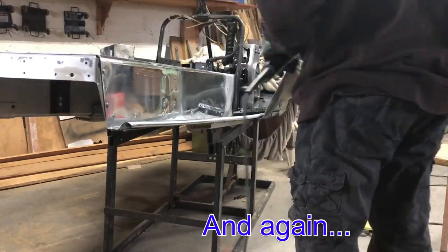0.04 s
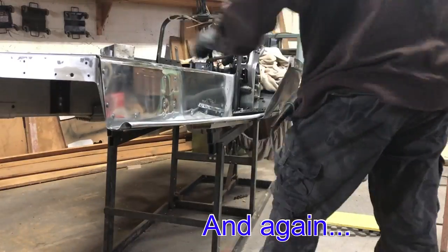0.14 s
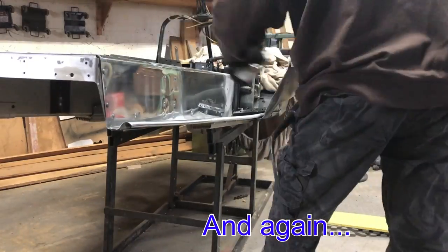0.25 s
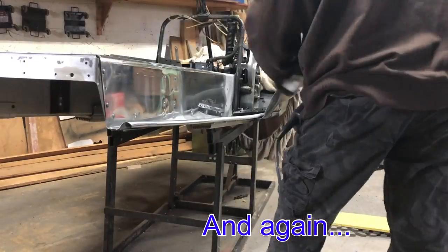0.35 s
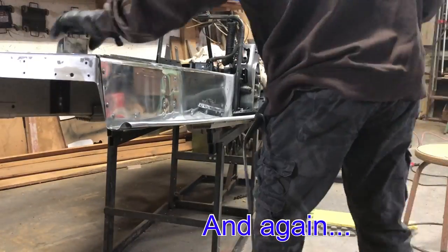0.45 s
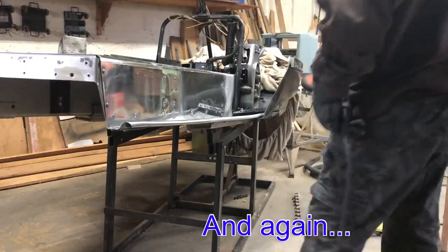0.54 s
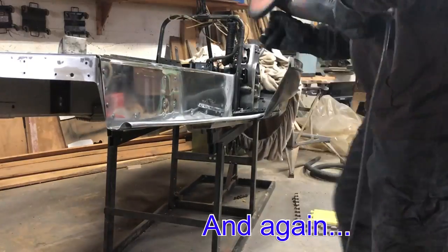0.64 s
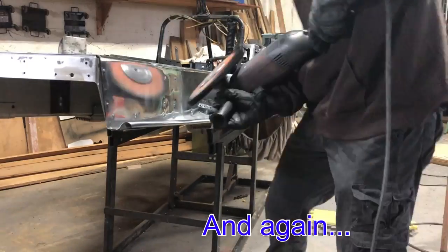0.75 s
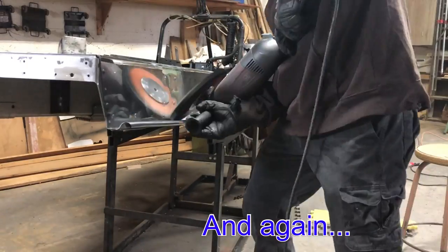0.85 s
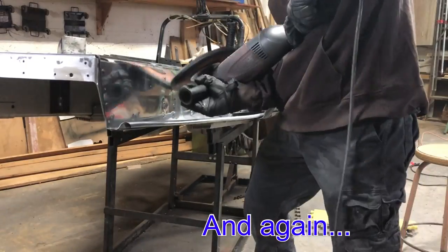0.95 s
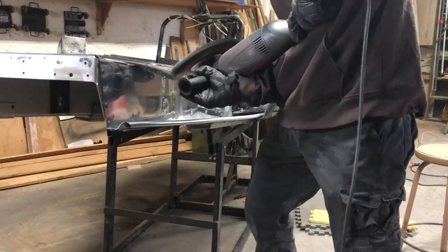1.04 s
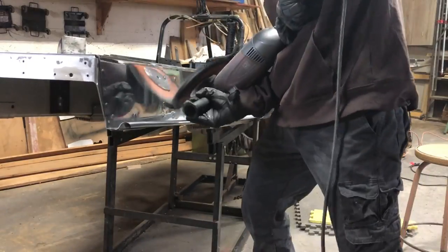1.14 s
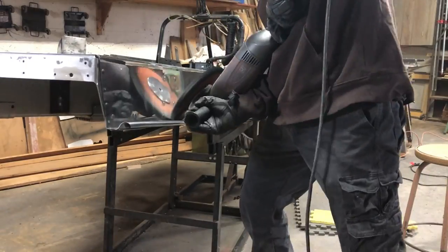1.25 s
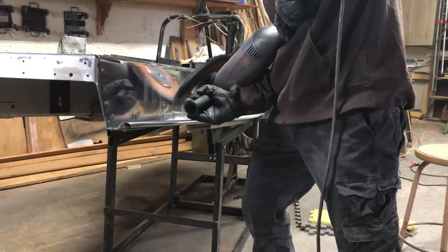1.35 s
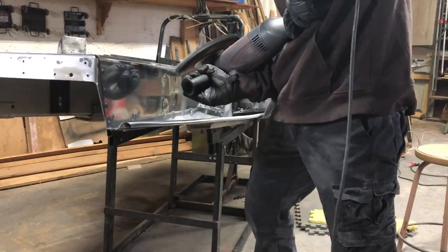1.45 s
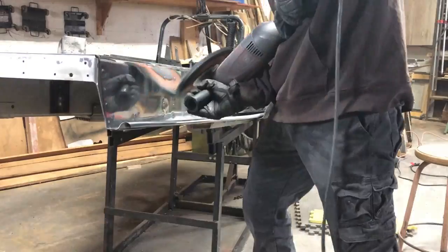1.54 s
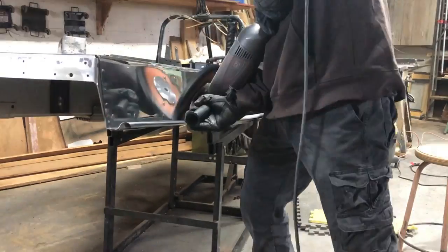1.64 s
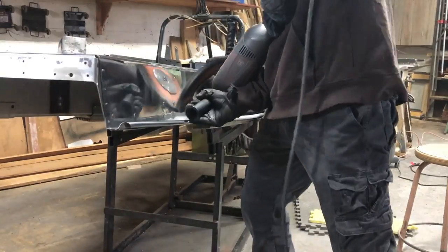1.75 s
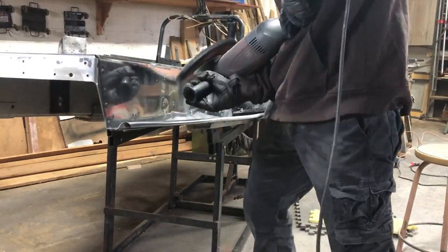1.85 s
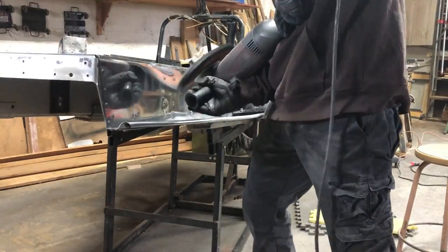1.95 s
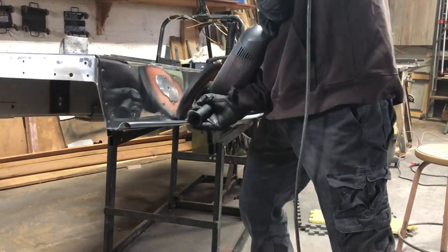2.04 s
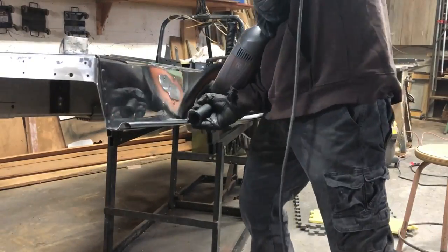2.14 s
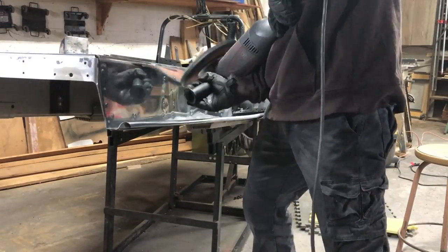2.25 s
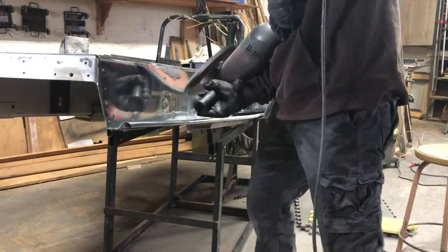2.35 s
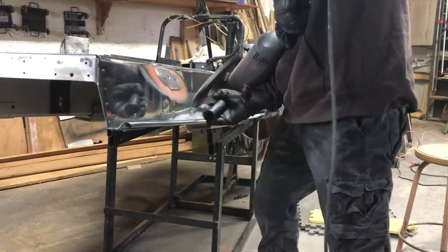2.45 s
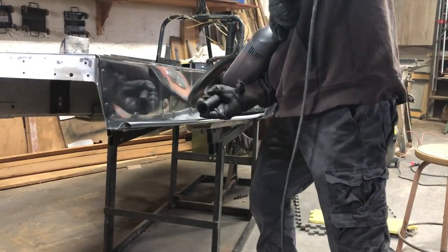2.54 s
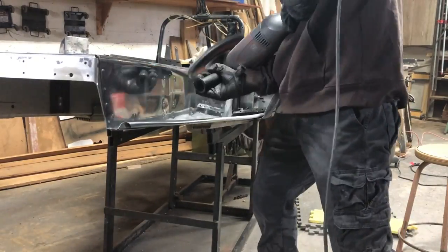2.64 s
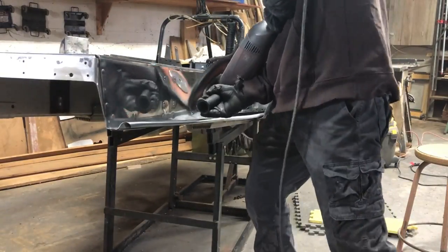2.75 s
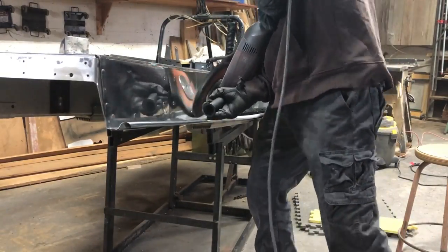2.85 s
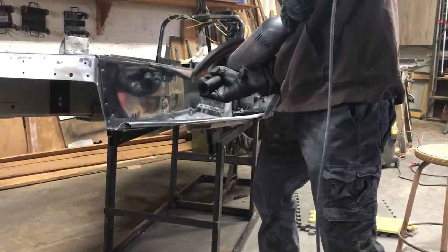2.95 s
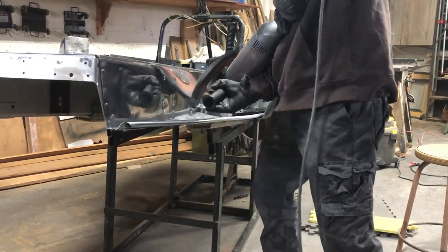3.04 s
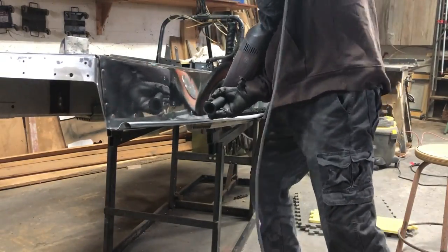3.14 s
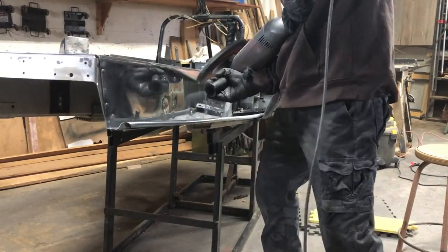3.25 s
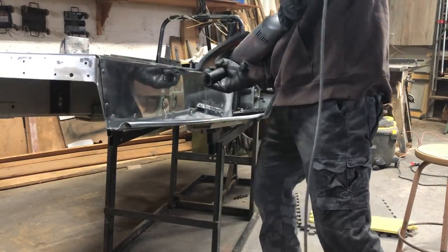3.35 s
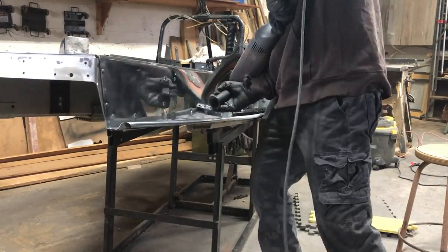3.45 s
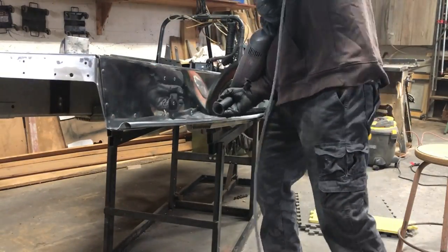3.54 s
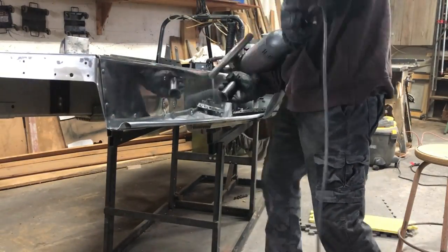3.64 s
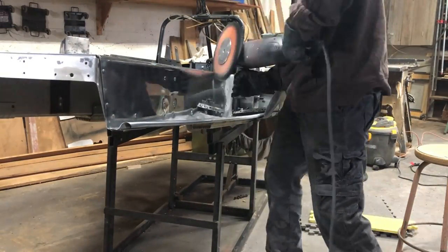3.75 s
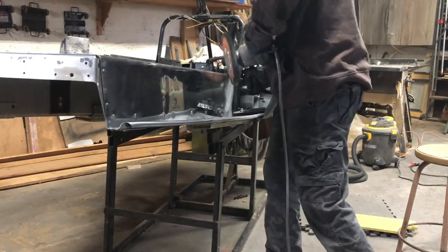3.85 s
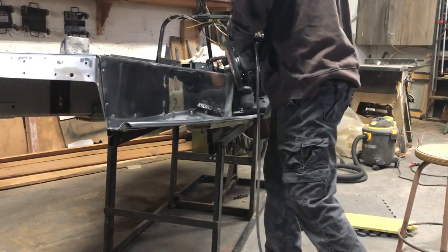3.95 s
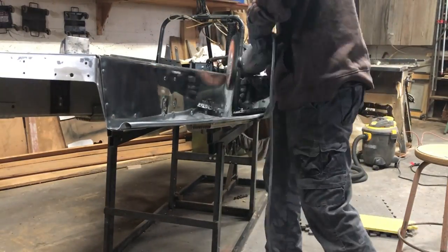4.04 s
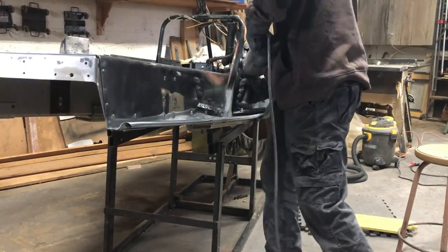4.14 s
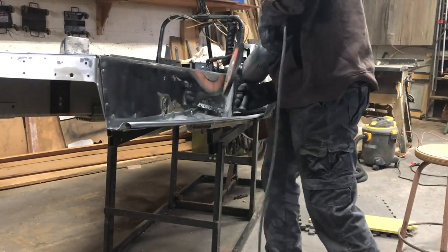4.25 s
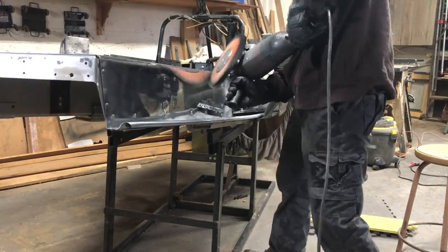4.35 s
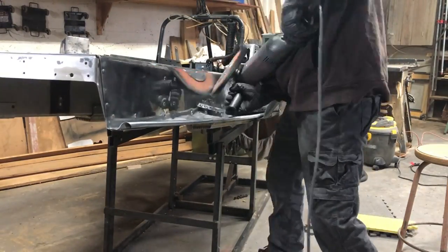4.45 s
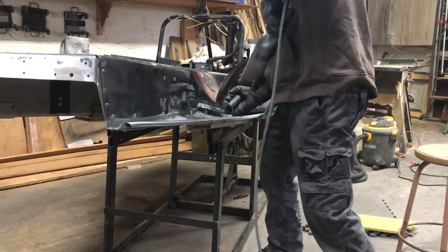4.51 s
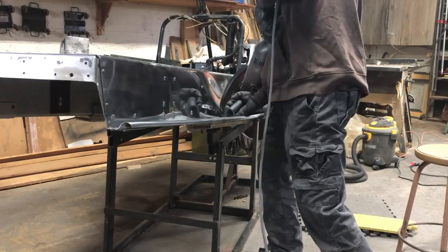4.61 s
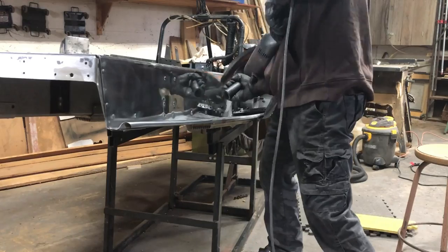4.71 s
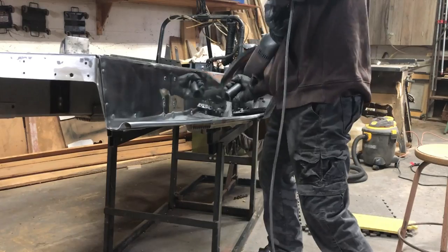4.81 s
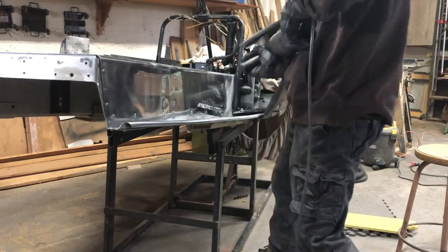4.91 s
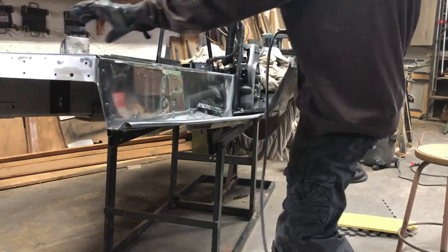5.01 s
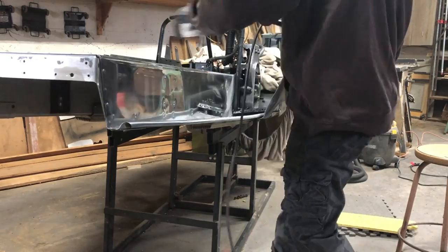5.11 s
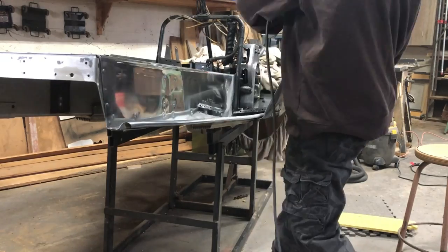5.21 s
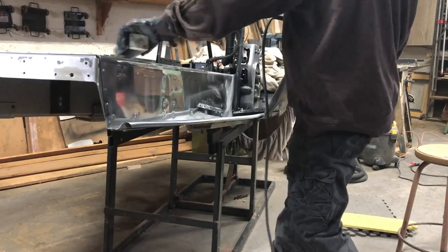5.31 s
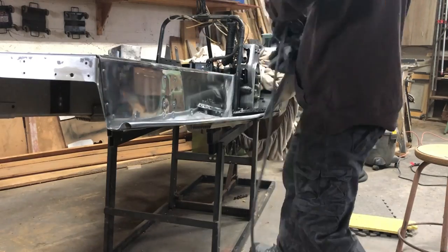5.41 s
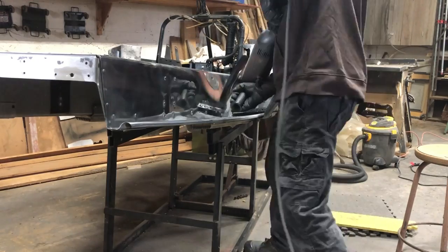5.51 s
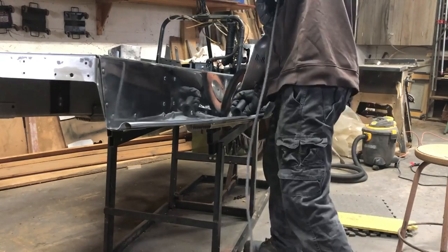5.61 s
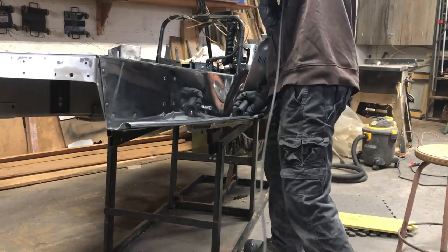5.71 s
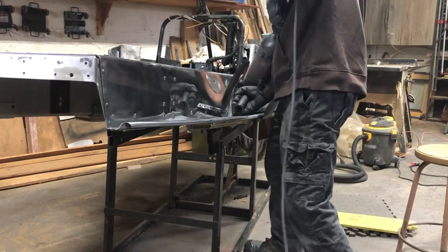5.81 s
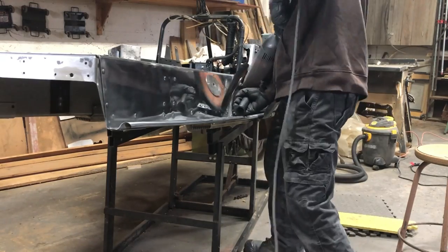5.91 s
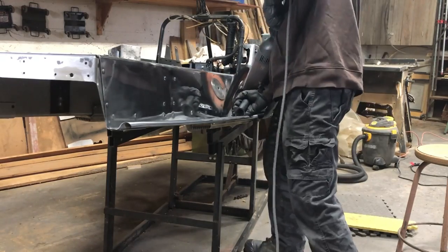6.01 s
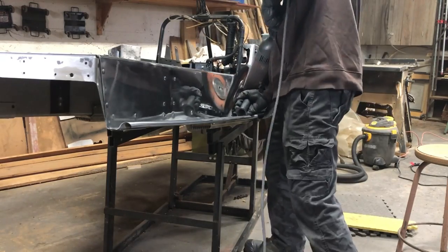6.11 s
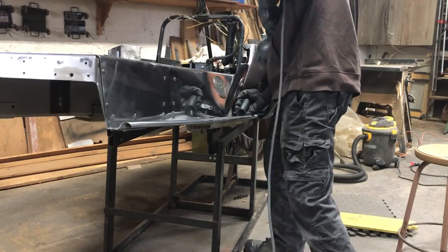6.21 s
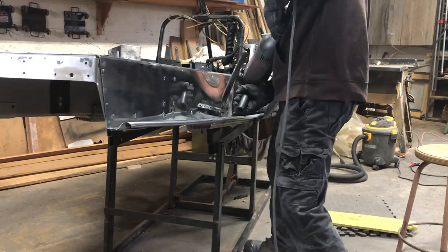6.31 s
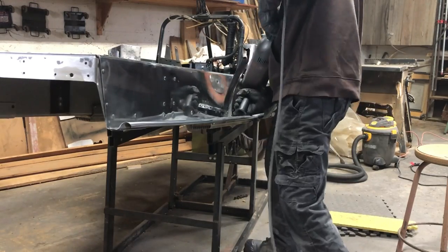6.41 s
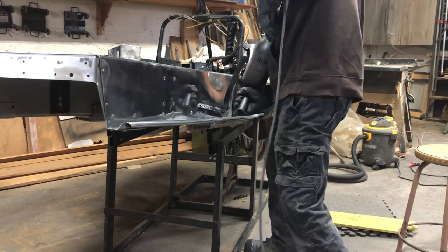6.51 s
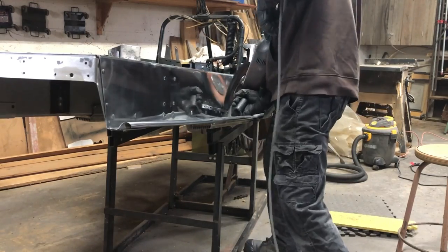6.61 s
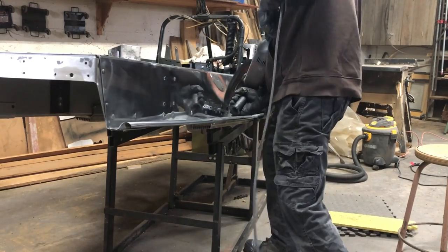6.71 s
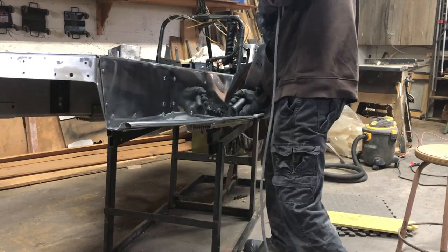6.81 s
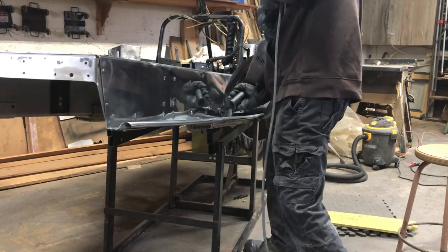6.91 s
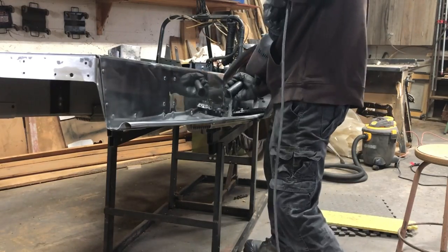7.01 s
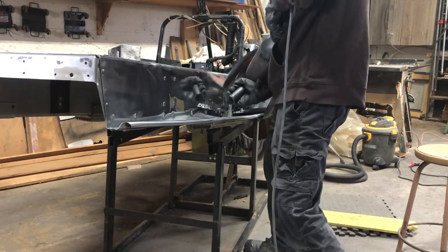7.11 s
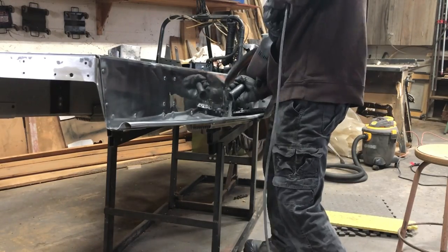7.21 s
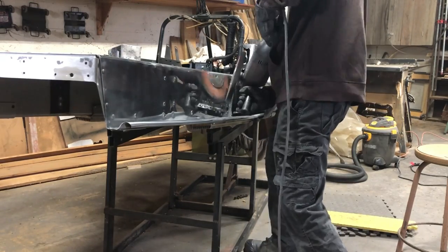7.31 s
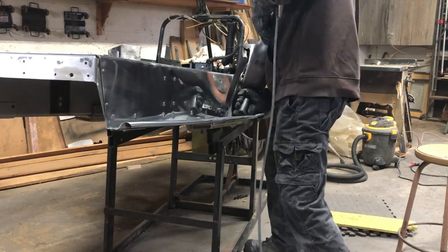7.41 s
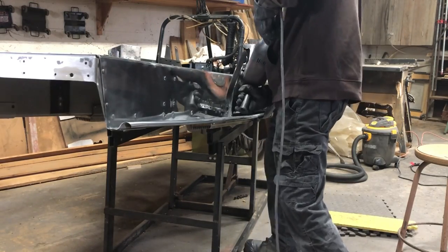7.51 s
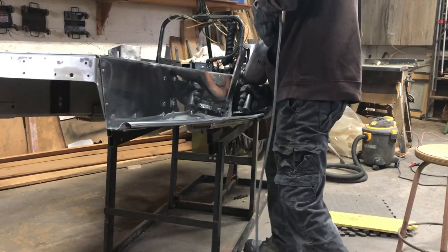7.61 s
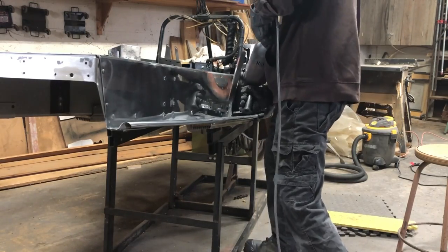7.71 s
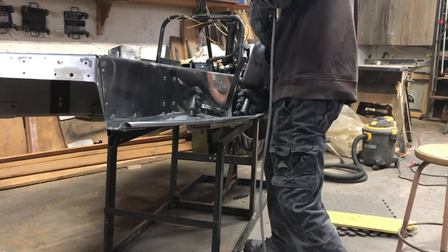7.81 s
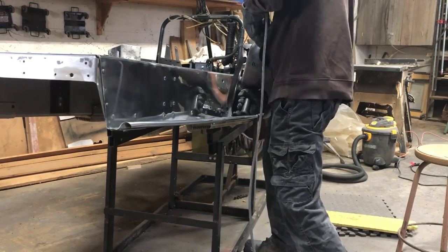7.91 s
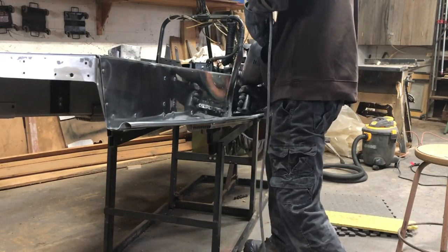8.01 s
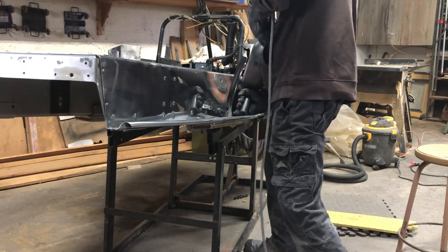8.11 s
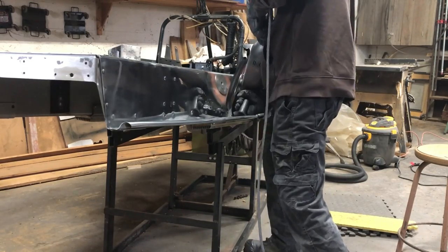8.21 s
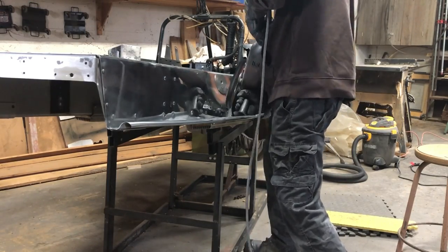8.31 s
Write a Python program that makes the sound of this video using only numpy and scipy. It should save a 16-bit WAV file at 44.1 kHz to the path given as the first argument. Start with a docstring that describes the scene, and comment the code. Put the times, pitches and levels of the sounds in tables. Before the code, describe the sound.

In a workshop, a power polisher starts and whines freely, then drops into a rough, fluctuating buzz as its pad works a metal panel.

```python
"""In a workshop, at one microphone: an electric polisher spins up and works a sheet-metal part in passes.
Pressing the pad down slows the motor and makes its shaft orders, summed as drifting sines, buzz.
Lifted, it runs free with a gear whine; shaped noise makes the air and friction hiss and the start-up rush.
Noise bursts click at the switch and at hard touches, and rattling knocks ring the part as it clanks.
Across the workshop another machine coasts down as a narrow noise band, among faint tones and a low rumble."""
import sys
import numpy as np
from scipy import signal
from scipy.io import wavfile
from scipy.ndimage import uniform_filter1d

SR = 44100
rng = np.random.default_rng(int(sys.argv[2]) if len(sys.argv) > 2 else 0)


def master(y):
    """Save y as 16-bit WAV."""
    cut = np.clip(np.atleast_2d(y).T, -1, 1)
    pcm = np.round(cut * 32767)  # scale
    wavfile.write(sys.argv[1], SR, pcm.astype(np.int16))


N = 368676
TIME = np.arange(N) / SR

# air and friction hiss, density per Hz before colour: t/s, low level/dB, middle level/dB, high level/dB
HISS_LEVELS = [(0, -76.5, -88, -98), (.175, -76.5, -79.5, -89), (.36, -66, -68.5, -70),
               (.444, -63, -62.5, -71), (.75, -63.5, -62, -67), (1, -68, -68, -69), (1.2, -71, -70, -67),
               (1.5, -66.5, -70, -71.5), (2, -65, -70, -74), (2.15, -65, -68, -71), (2.4, -66, -70, -75),
               (2.7, -68, -70, -71), (3.4, -67.5, -71, -76), (3.82, -72, -72, -71), (4.1, -73, -75, -78),
               (4.8, -72, -73, -71), (5.0, -70, -70, -74), (5.15, -67, -66, -73), (5.28, -67.5, -63.5, -68),
               (5.5, -66.5, -66, -70), (5.7, -67, -67, -68), (6.15, -67, -72, -70), (6.8, -71, -74, -75),
               (7.25, -71, -73, -75), (7.5, -68.5, -72, -70), (8.36, -68.5, -72, -74)]
# where those three levels hold: f/Hz
HISS_ANCHORS_HZ = (1800, 5500, 10500)
# fixed spectral colour added to the hiss: f/Hz, level/dB
HISS_COLOUR_DB = [(150, -28), (260, -23.5), (400, -22.5), (700, -13.5), (1200, -9), (2000, -4), (3200, -1),
                  (5000, 0), (8800, 4), (12000, 0), (15800, -0.5)]
# the other machine coasting down: t/s, f/Hz, level/dB
COASTING_MACHINE = [(1.1, 724, -67), (1.5, 686, -56.5), (3.3, 593.5, -56), (4.5, 575.8, -65),
                    (6.0, 520, -63), (6.4, 518.5, -55), (6.6, 471.6, -75)]
# faint tones that come and go: middle t/s, length/s, f/Hz, level/dB
FAINT_TONES = [(0.198, 0.61, 430, -79), (.2, .55, 511, -61.5), (0.222, 0.62, 730, -56.5),
               (0.33, 0.25, 2420, -42), (0.3, 0.23, 3120, -40), (0.802, 0.31, 1270, -43),
               (1.34, 0.11, 714, -46), (1.672, .1, 713, -47), (2.095, 0.14, 730, -49),
               (5.46, 0.11, 317, -48), (6.002, 0.045, 722, -39.5), (8.312, 0.093, 728, -44)]
# low rumble before its flicker: t/s, level/dB
RUMBLE_LEVEL = [(0.0, -89), (0.09, -104), (0.92, -64.5), (1.11, -74), (1.27, -57), (1.31, -70), (2.29, -66),
                (2.36, -94), (2.96, -64), (3.05, -94), (3.23, -64), (3.44, -100), (3.58, -61), (3.63, -78),
                (5.39, -97), (5.55, -71), (6.06, -68), (6.15, -80), (6.59, -68), (6.91, -101), (7.61, -84),
                (8.07, -94), (8.14, -73), (8.3, -95)]
# bright bursts: t/s, relative level/dB, centre f/Hz, width f/Hz, hold/s, t60/s
CLICK_BURSTS = [(.107, -37, 13000, 4000, .004, .02), (.134, -19.5, 7500, 8000, .003, .012),
                (.194, -32, 11000, 6000, .002, .02), (.37, -12, 7200, 4000, .032, .03),
                (.508, -13, 3500, 3000, .006, .05), (1.85, -14.5, 3500, 4000, .02, .04),
                (5.407, -9, 2900, 2400, .011, .04)]
# shaft speed as the load sets it, once spun up: t/s, f/Hz
LOADED_SPEED = [(.6, 560), (.75, 548.6), (.86, 544), (.928, 533), (.99, 506), (1.07, 458.5), (1.24, 422),
                (1.3, 432), (1.394, 466.4), (1.51, 438.6), (1.58, 443), (1.626, 434), (1.7, 447),
                (1.81, 451.2), (1.968, 430), (2.015, 442.3), (2.108, 441.7), (2.24, 459.8), (2.33, 447),
                (2.432, 461.4), (2.482, 509), (2.555, 541), (2.62, 501), (2.72, 479), (2.896, 463.5),
                (2.98, 466.7), (3.07, 462.3), (3.115, 469.5), (3.273, 471), (3.31, 464), (3.42, 475),
                (3.445, 468), (3.502, 490), (3.614, 464.3), (3.667, 477.4), (3.734, 478), (3.784, 495),
                (3.864, 434.6), (3.914, 418.5), (3.99, 440), (4.058, 448), (4.22, 441.6), (4.33, 476.6),
                (4.447, 462.5), (4.525, 504.3), (4.6, 507), (4.649, 485), (4.722, 489), (4.794, 455.6),
                (4.896, 468), (4.925, 454), (5.049, 540.5), (5.118, 546), (5.24, 542), (5.318, 497),
                (5.4, 533), (5.507, 536), (5.602, 530.3), (5.8, 440), (5.884, 441.5), (6, 460.6),
                (6.039, 452), (6.2, 475), (6.293, 480.5), (6.38, 473.3), (6.448, 479.5), (6.632, 458),
                (6.68, 458), (6.71, 449.5), (6.85, 462.5), (6.967, 461.4), (7.044, 474), (7.14, 459),
                (7.229, 465), (7.318, 454.4), (7.415, 493.5), (7.63, 473), (7.82, 485.5), (7.934, 486),
                (8.16, 477.3), (8.36, 487.5)]
# rising rush at spin-up: t/s, level/dB
START_RUSH = [(.17, -67), (.22, -34), (.27, -29.5), (.31, -18.5), (.36, -25), (.39, -50)]

# pad on the metal, orders 3 up relative to ORDER_LEVELS_DB and order 2 to SECOND_DB:
# touch t/s, lift t/s, order 2 level/dB, low orders level/dB, middle orders level/dB, high orders level/dB
PAD_PASSES = [(.885, 2.431, -3.5, -4.5, .4, 2.4), (2.561, 3.76, -2, -3, 1, 1),
              (3.765, 4.939, -12.5, -9, -3.5, 0.5), (5.138, 5.2, 0.5, -8, -6, -10),
              (5.255, 5.317, 0, 0, -5, -3), (5.57, 6.99, -1, -3, 0, 3), (6.995, 7.37, -3, -7, -2.5, 1),
              (7.375, 8.401, 1.5, 0, 2, 3)]
# the same four levels while the tool runs free: order 2, low, middle, high level/dB
FREE_LEVELS_DB = (-2.5, -15, -21.5, -15)
# leaning into a stroke makes the sheet boom, easing off thins the buzz:
# middle t/s, length/s, change of order 2 level/dB, of low level/dB, of middle level/dB, of high level/dB
PAD_STROKES = [(.93, .08, 0, 0, -5, -2), (1.02, .1, 0, -3, 2, -1), (1.257, .14, 11, 6, 4, 1),
               (1.441, .13, 18.5, 15, 6, -4), (1.645, 0.14, 13, 9.5, 4, 1), (1.829, 0.19, 19.5, 12.5, 3, 2),
               (1.99, .06, -5, -2, -4, 0), (2.08, 0.14, 13.5, 17, 3, 1), (2.284, 0.14, 18, 12, 3, -1),
               (2.88, 0.17, 5, 12.5, 4, 0), (2.991, 0.082, 9.5, 10, 2, 1), (3.08, .06, -4, -8, -3, -2),
               (3.161, 0.09, 7.5, 14, 3, 1), (3.28, 0.12, 13, 6, 3, 0), (3.43, .1, -5, -8, -9, -6),
               (3.569, 0.095, 20.5, 10, 5, -6), (3.69, 0.058, 8, 2, 3, 2), (3.76, .06, -5, -6, -4, -7),
               (4.13, .1, -5, -2, -4, -2), (4.28, .1, 0, 3, -4, -3), (4.59, 0.085, 23, 2, -1, -4),
               (4.829, 0.21, 24, 3, 0, -1), (5.15, 0.15, 6, 5, 0, 0), (5.64, .14, 10, 2, 0, 0),
               (5.89, 0.1, 11, 3, -4, -1), (6.14, 0.22, 1, 11.5, 3, -6), (6.3, .1, 8.5, 8, 4, 3),
               (6.41, .06, 0, -2, -5, 0), (6.501, 0.11, 11.5, 7.5, 0, 0), (6.63, .06, -4, -4, -3, -2),
               (6.741, 0.19, 4, 7, -1, 2), (7.252, .12, 5, 5, 1, -1), (7.35, .06, -8, -2, -3, -3),
               (7.472, 0.15, 4.5, 8, 0, 2), (7.79, .1, 0, -6, 0, -1), (8.03, .08, 0, -2, -1, -6)]
# shaft orders at which the low, middle and high levels hold: order
BUZZ_ANCHOR_ORDERS = (4, 12, 23)
# base level of shaft orders 3, 4, 5 and up, before load and fading: level/dB
ORDER_LEVELS_DB = [-40, -38, -38, -33, -31.5, -37.5, -32.5, -34.5, -35, -31, -32.5, -30.5, -33.5, -31,
                   -32.5, -32, -29.5, -29.5, -35, -34, -34, -36.5, -33.5, -34.5, -42, -35, -35, -46, -39,
                   -33.5, -38, -34.5, -43]
# order 1, the imbalance of the rotor, before fading: t/s, level/dB
ROTOR_IMBALANCE = [(.47, -48), (.68, -42), (1.1, -68), (1.34, -54.5), (2.13, -54.5), (2.77, -62),
                   (4.2, -68.5), (4.39, -56.5), (4.87, -77), (5.19, -48.5), (5.86, -65), (6.29, -55.5),
                   (7.04, -62.5), (8.36, -53)]
# one order sings out for a moment: middle t/s, shaft order, length/s, rise level/dB
SINGING_ORDERS = [(0.612, 6, 0.16, 24), (0.8, 6, 0.24, 17), (1.1, 15, 0.11, 9), (1.23, 6, 0.17, 8),
                  (1.407, 21, 0.062, 14), (1.757, 5, 0.21, 5.5), (1.76, 12, 0.27, 9), (1.91, 6, .15, 8.5),
                  (2.001, 13, 0.35, 7), (2.212, 7, 0.17, 10.5), (3.058, 21, 0.29, 9), (3.138, 11, 0.37, 7),
                  (3.658, 7, 0.22, 6.5), (4.138, 4, 0.4, 10), (4.591, 7, 0.08, 7), (4.812, 6, 0.21, 7),
                  (5.699, 18, 0.11, 14), (5.986, 4, 0.41, 6), (6.079, 17, 0.2, 9.5), (6.104, 9, 0.16, 10.5),
                  (6.146, 18, 0.45, 9), (6.154, 19, 0.26, 4), (6.23, 7, .2, 6), (6.543, 19, 0.23, 9.5),
                  (6.603, 6, 0.28, 9), (6.85, 17, 0.45, 6), (6.913, 6, 0.24, 14), (6.851, 4, 0.36, 9.5),
                  (7.665, 18, 0.46, 10), (7.753, 4, 0.44, 8), (8.045, 5, 1, 9), (8.109, 18, 0.21, 11.5),
                  (8.128, 4, 0.61, 3)]
# how much the pad chatters on the metal: t/s, share (1 = usual)
PAD_CHATTER = [(.9, 1.5), (1.45, 1.3), (1.7, .9), (2.4, 1.1), (2.62, 1.4), (2.8, .8), (3.3, .8), (3.5, 1.2),
               (4.1, .8), (4.9, 1.3), (5.6, 1.1), (5.9, 1.3), (6.1, .6), (6.3, .6), (6.7, 1.2),
               (7.35, 1.15), (7.5, .7), (8.36, .6)]
# the pad hops: a crest t/s, period/s, middle t/s, half length/s
PAD_BOUNCE = (7.172, .06, 7.14, .09)
# gear whine, fundamental and overtones relative to GEAR_DB: level/dB
GEAR_HARMONICS_DB = [-5.5, -12, -12, -26, -8]
# blows on the part: t/s, relative level/dB, rattle hold/s, rattle decay/s
CLANK_BLOWS = [(.508, -12.5, .008, .03), (.929, -25, .003, .008), (1.87, -22, .004, .008),
               (1.955, -18, .004, .008), (2.097, -15, .02, .015), (2.134, -16, .01, .012),
               (5.4065, -12, .011, .012), (7.385, -24, .005, .01)]
# ringing modes of the part: f/Hz, relative level/dB, t60/s
PART_MODES = [(720, -16, .08), (1030, -7, .06), (1620, -2, .02), (2200, 0, .012), (2900, -2, .01),
              (3900, -5, .008), (4700, -4, .01)]

SWITCH_S, SPIN_UP_S = .1, .27  # the shaft nears its speed as 1 - exp(-(t / SPIN_UP_S) ** 2)
INERTIA_S = .03  # the rotor rounds off changes of load
TOUCH_S, LIFT_S = .028, .022  # time to settle on and to leave the metal
SECOND_DB = -43.5  # base level of order 2, before load and fading
# the grip shifts suddenly: new level, phase and shaft speed
SHIFTS_PER_S, SHIFT_DB, SHIFT_TURNS, SHIFT_HZ = 20, 2.1, .17, .8
GEAR_ORDER = 4.41  # gear whine cycles per shaft turn
GEAR_DB, GEAR_FREE_HZ, GEAR_DB_PER_HZ = -31, 555, .18  # the whine sinks as the load slows the shaft
MOTOR_STEP_S = 1 / 400  # spacing of the motor's control points
EDGE_HZ = 15730  # upper band limit


def gain_of(db):
    """Decibels to amplitude."""
    return 10 ** (np.asarray(db) / 20)


def evened(x):
    """Rms 1 along the last axis."""
    return x / np.sqrt(np.mean(x ** 2, -1, keepdims=True) + 1e-20)


def follow(rows, t):
    """Every column of a curve table, read at the times t."""
    s, *columns = np.transpose(rows)
    return np.array([np.interp(t, s, c) for c in columns])


def across(anchors, curves, where):
    """Blends curves given at a few anchors over a log axis."""
    weights = [np.interp(np.log(where), np.log(anchors), one) for one in np.eye(len(anchors))]
    return np.transpose(weights) @ curves


def drift(shape, seconds, step):
    """Slow chance of rms 1, sampled every step seconds."""
    size = max(round(seconds / step), 1)
    once = uniform_filter1d(rng.standard_normal(shape), size)
    return evened(uniform_filter1d(once, size))


def resonate(x, hz, width):
    """Shifts hz down to zero, smooths, and shifts back: a resonance of gain 1."""
    turn = np.exp(2j * np.pi * np.cumsum(hz * np.ones(len(x))) / SR)
    r = np.exp(-np.pi * width / SR)
    return 2 * (turn * signal.lfilter([1 - r], [1, -r], x / turn)).real


def thin(x, hz):
    """Takes the bass out of a small, light impact."""
    return signal.sosfilt(signal.butter(2, hz, "high", fs=SR, output="sos"), x)


def add(mix, s, sound):
    """Mixes a sound in at s seconds."""
    part = mix[round(s * SR):][:len(sound)]
    part += sound[:len(part)]


def tone(turns, height):
    """A sine of the given rms height."""
    return np.sqrt(2) * height * np.cos(2 * np.pi * turns)


def hiss():
    """Air and friction: random short-time spectra under three level curves, patchy and flickering."""
    size, hop = 512, 128
    frames = N // hop + 5
    hz = np.fft.rfftfreq(size, 1 / SR) + 1
    a, b, patches = rng.standard_normal((frames, len(hz), 3)).T
    spectra = a + 1j * b
    patches = evened(uniform_filter1d(uniform_filter1d(patches, 8, 0), 10, 1))
    t = np.arange(frames) * hop / SR
    colour_hz, colour_db = np.transpose(HISS_COLOUR_DB)
    field_db = across(HISS_ANCHORS_HZ, follow(HISS_LEVELS, t), hz)
    field_db += np.interp(np.log(hz), np.log(colour_hz), colour_db)[:, None]
    field_db += 2.8 * patches + drift(frames, .0068, hop / SR)
    white = signal.istft(spectra, nperseg=size, noverlap=size - hop)[1]
    shaped = signal.istft(spectra * gain_of(field_db), nperseg=size, noverlap=size - hop)[1]
    return shaped[:N] * np.sqrt(SR / 2) / white.std()  # 0 dB is unit power per Hz


def coasting_machine():
    """A machine across the workshop slows down: noise through a narrow, falling resonance."""
    hz, db = follow(COASTING_MACHINE, TIME)
    return gain_of(db) * evened(resonate(rng.standard_normal(N), hz, 3.0))


def rumble():
    """Low-passed noise makes a faint flickering rumble that comes and goes."""
    low = signal.sosfilt(signal.butter(2, 220, fs=SR, output="sos"), rng.standard_normal(N))
    return evened(low) * gain_of(follow(RUMBLE_LEVEL, TIME)[0] + 5.5 * drift(N, .02, 1 / SR))


def faint_tones():
    """Faint sines around the bench swell and fade, their phase drifting slightly."""
    out = np.zeros(N)
    for s, length, hz, db in FAINT_TONES:
        t = TIME[:round(2 * length * SR)] - length
        swell = np.exp(-(t / (.5 * length)) ** 4)
        hoot = gain_of(db) * swell * tone(hz * t + .2 * drift(len(t), 30 / hz, 1 / SR), 1)
        before_start = max(round((length - s) * SR), 0)
        add(out, max(s - length, 0), hoot[before_start:])
    return out


def clicks():
    """The switch and hard touches: short bright noise bursts that hold, then die away."""
    out, t = np.zeros(N), TIME[:SR // 8]
    for s, db, centre_hz, width_hz, hold, t60 in CLICK_BURSTS:
        noise = rng.standard_normal(len(t))
        for _ in range(2):
            noise = resonate(noise, centre_hz, width_hz)
        noise = evened(thin(noise, 2500))
        level_db = db - 9 - 60 * np.maximum(t - hold, 0) / t60
        add(out, s, noise * gain_of(level_db) * np.minimum(t / .0005, 1))
    return out


def shaft():
    """Shaft speed in Hz: the spin-up, then the sag under load."""
    loaded_hz = uniform_filter1d(follow(LOADED_SPEED, TIME)[0], round(INERTIA_S * SR))
    since_switch = np.maximum(TIME - SWITCH_S, 0)
    return loaded_hz * (1 - np.exp(-(since_switch / SPIN_UP_S) ** 2))


def whoosh(hz):
    """A band of air noise tied to a high shaft order sweeps up as the motor starts."""
    size = SR // 2
    centre = np.minimum(41.6 * hz[:size], SR / 2.2)
    rush = resonate(resonate(rng.standard_normal(size), centre, 2500), centre, 2500)
    return np.pad(evened(rush) * gain_of(follow(START_RUSH, TIME[:size])[0]), (0, N - size))


def buzz(t):
    """Load level in dB of order 2 and of the low, middle and high orders, from passes and strokes."""
    db = np.outer(FREE_LEVELS_DB, np.ones(len(t)))
    for touch, lift, *on_db in PAD_PASSES:
        contact = np.clip(np.minimum((t - touch) / TOUCH_S, 1 + (lift - t) / LIFT_S), 0, 1)
        db += np.outer(np.subtract(on_db, FREE_LEVELS_DB), contact)
    for s, length, *change_db in PAD_STROKES:
        db += np.outer(change_db, np.exp(-((t - s) / (.54 * length)) ** 2))
    return db


def order_fading(t, shape, chatter, grip):
    """Each order fades on its own as the tool tilts and the grip shifts; a singing order holds steady."""
    fading_db = 3.1 * chatter * drift(shape, .018, MOTOR_STEP_S) + 1.73 * drift(shape, .072, MOTOR_STEP_S)
    fading_db += SHIFT_DB * uniform_filter1d(rng.standard_normal(shape)[:, grip], size=3)
    fading_db = np.minimum(fading_db, 7.0 * np.tanh(fading_db / 2.6)) - .7  # deep fades, modest peaks
    for s, order, length, rise_db in SINGING_ORDERS:
        hold = np.exp(-((t - s) / (.39 * length)) ** 4)
        row = round(order) - 1
        fading_db[row] += hold * (rise_db - .87 * fading_db[row])
    return fading_db


def gear_whine(t, hz, turns):
    """Gear teeth sing at a fixed multiple of the shaft turns, with overtones, louder at higher speed."""
    out = np.zeros(N)
    gear_db = GEAR_DB + GEAR_DB_PER_HZ * (np.interp(t, TIME, hz) - GEAR_FREE_HZ)
    gear_db += np.interp(t, [.4, .5], [-40, 0])
    for k, db in enumerate(GEAR_HARMONICS_DB, 1):
        height = gain_of(gear_db + db + 3 * drift(len(t), .03, MOTOR_STEP_S))
        out += tone(k * GEAR_ORDER * turns, np.interp(TIME, t, height))
    return out


def motor(hz):
    """All shaft orders as sines locked to the shaft turns, plus the gear whine."""
    t = np.arange(0, N / SR + MOTOR_STEP_S, MOTOR_STEP_S)
    orders = np.arange(1, len(ORDER_LEVELS_DB) + 3)
    shape = (len(orders), len(t))
    chatter = follow(PAD_CHATTER, t)[0]
    grip = np.cumsum(rng.random(len(t)) < SHIFTS_PER_S * MOTOR_STEP_S)  # counts the shifts
    fading_db = order_fading(t, shape, chatter, grip)

    second_db, *rest_db = buzz(t)
    loaded_db = np.array(ORDER_LEVELS_DB)[:, None] + fading_db[2:]
    loaded_db += across(BUZZ_ANCHOR_ORDERS, np.array(rest_db), orders[2:])
    # the pad grips and lets go: orders 3 and up flutter together
    loaded_db += 1.1 * chatter * drift(len(t), .015, MOTOR_STEP_S)
    rotor_db = follow(ROTOR_IMBALANCE, t) + .48 * fading_db[0]
    level_db = np.vstack([rotor_db, SECOND_DB + second_db + .66 * fading_db[1], loaded_db])
    level_db += np.interp(t, [.38, .47], [-50, 0])  # the orders emerge once the shaft is near speed

    # off the metal the motor runs faster and quieter
    crest, period, middle, half = PAD_BOUNCE
    hop = np.cos(2 * np.pi * (t - crest) / period) * np.exp(-((t - middle) / half) ** 4)
    level_db[1:] -= 1.9 * hop

    # the pad drags unevenly
    wobble_hz = 1.05 * chatter * drift(len(t), .02, MOTOR_STEP_S) + 3.2 * hop
    wobble_hz += SHIFT_HZ * chatter * uniform_filter1d(rng.standard_normal(len(t))[grip], size=3)
    turns = np.cumsum(hz + np.interp(TIME, t, wobble_hz)) / SR

    # paths to the microphone differ and shift (turns); grip shifts move high orders most
    lags = rng.random((len(orders), 1)) + .063 * drift(shape, .031, MOTOR_STEP_S)
    shifts = uniform_filter1d(rng.standard_normal(shape)[:, grip], size=2)
    lags += SHIFT_TURNS * np.sqrt(orders / len(orders))[:, None] * shifts

    out = np.zeros(N)
    for k, height, lag in zip(orders, gain_of(level_db), lags):
        sine = tone(k * turns + np.interp(TIME, t, lag), np.interp(TIME, t, height))
        out += sine * (k * hz < SR / 2.1)
    return out + gear_whine(t, hz, turns)


def clanks():
    """A short rattle of knocks rings the modes of the part."""
    out, t = np.zeros(N), TIME[:SR // 2]
    ring = sum(gain_of(db - 60 * t / t60) * np.sin(2 * np.pi * hz * t) for hz, db, t60 in PART_MODES)
    for s, db, hold, decay in CLANK_BLOWS:
        knocks = rng.standard_normal(6000) * np.exp(-np.maximum(t[:6000] - hold, 0) / decay)
        sound = thin(signal.fftconvolve(knocks, ring), 900)
        onset_rms = np.sqrt(np.mean(sound[:600] ** 2))
        add(out, s, gain_of(db) * sound / onset_rms / 3)
    return out


def scene():
    """Everything reaches one microphone; little bass carries through the air."""
    hz = shaft()
    polisher = motor(hz) + hiss() + whoosh(hz)
    air = polisher + clicks() + clanks() + coasting_machine() + faint_tones()
    mono = signal.sosfilt(signal.butter(6, 270, "high", fs=SR, output="sos"), air) + rumble()
    return np.array([mono, mono])


def record(dry):
    """The loudest peaks are rounded off softly; then the band limit."""
    knee, room = .6, .35  # amplitude where rounding starts, and the most that can lie above it
    over = np.sign(dry) * (knee + room * np.tanh((abs(dry) - knee) / room))
    rounded = np.where(abs(dry) > knee, over, dry)
    low_pass = signal.firwin(1023, EDGE_HZ, window=("kaiser", 10), fs=SR)
    return signal.oaconvolve(rounded, low_pass[None], "same")


dry = scene()
out = record(dry)
master(out)
```